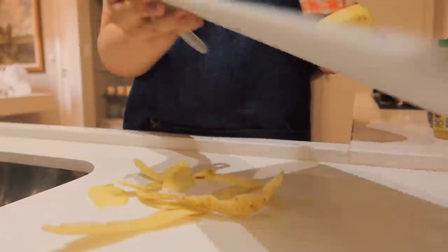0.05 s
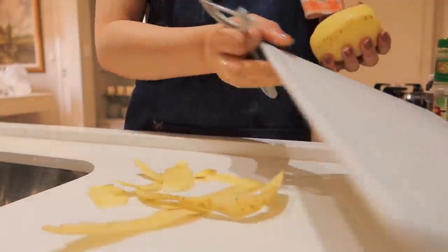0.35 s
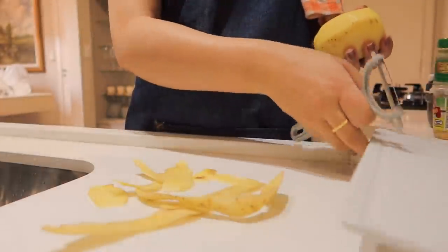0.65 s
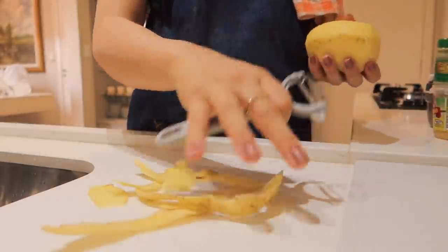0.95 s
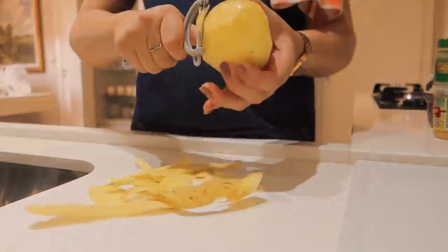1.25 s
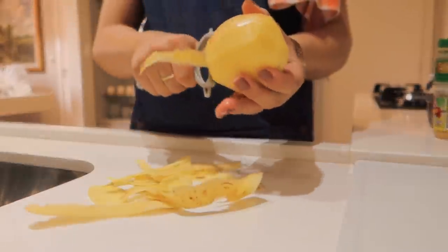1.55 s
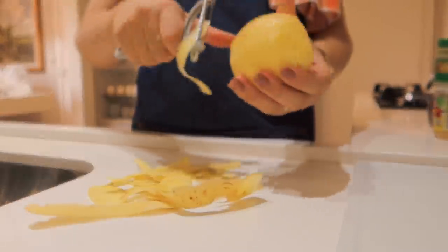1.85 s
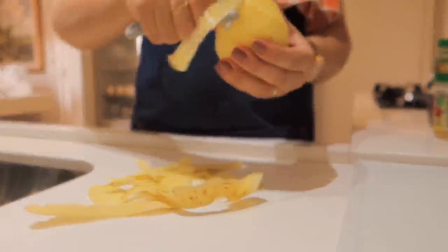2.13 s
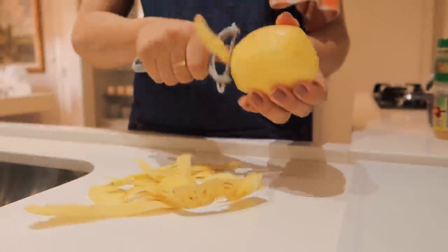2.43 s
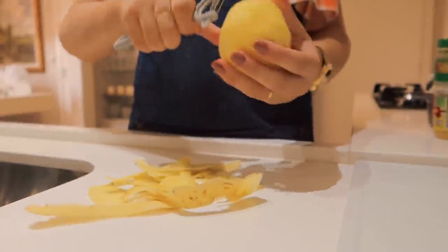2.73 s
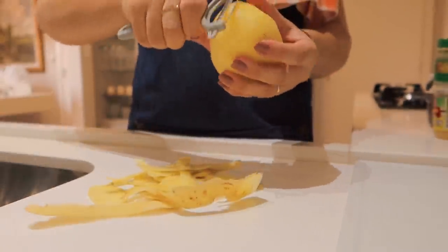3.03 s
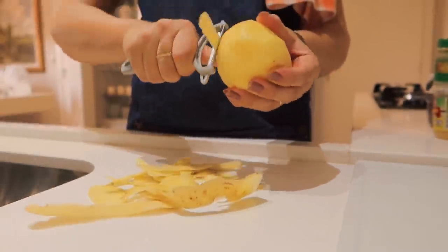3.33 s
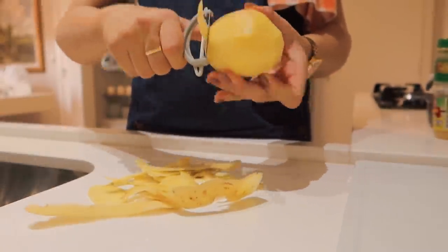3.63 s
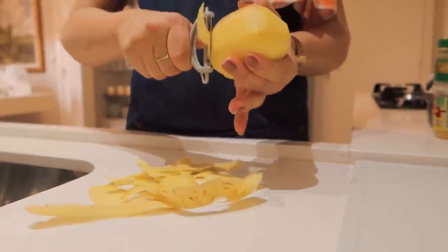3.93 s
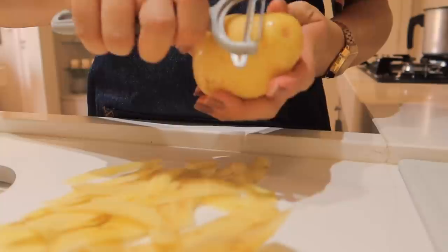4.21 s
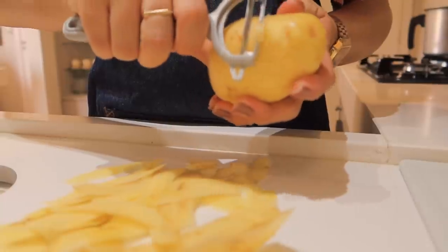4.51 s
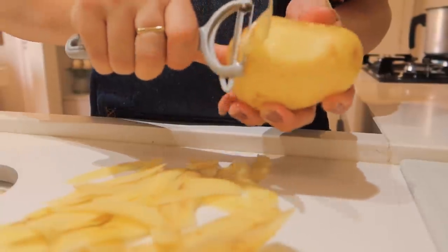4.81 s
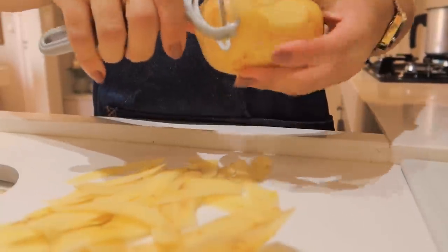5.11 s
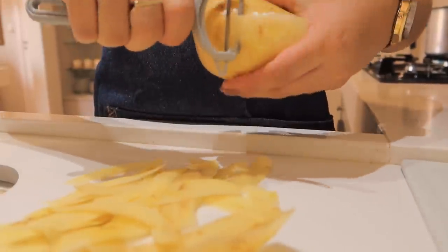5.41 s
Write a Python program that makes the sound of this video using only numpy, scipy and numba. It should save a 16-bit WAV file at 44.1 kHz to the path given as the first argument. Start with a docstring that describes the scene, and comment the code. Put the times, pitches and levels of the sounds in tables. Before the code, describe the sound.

A plastic cutting board clatters onto a kitchen counter, then a hand peeler scrapes a potato in short, irregular strokes.

```python
"""First a plastic cutting board knocks on a kitchen counter, skids and slaps flat.
Each knock is a sharp crack, a clack from the edge and a low boom. Then a hand peeler strips a potato:
each stroke bursts a run of tiny cells and rings the loose swivel blade, which also ticks between strokes.
A small, hard room echoes over a low, steady hush, and the first peaks of the hardest knocks clip."""
import sys
import numpy as np
from scipy import signal
from scipy.fft import rfft, irfft
from scipy.io import wavfile
from scipy.ndimage import uniform_filter1d, map_coordinates
from numba import njit

SR = 44100
rng = np.random.default_rng(int(sys.argv[2]) if len(sys.argv) > 2 else 0)


def inscribe(sig):
    """Save sig as 16-bit PCM at rate SR to the path in sys.argv[1].

    A 1-D sig is mono; a 2-D sig holds one channel per row.
    Samples are clipped to [-1, 1] before scaling.
    """
    pcm = np.round(np.clip(np.atleast_2d(sig).T, -1, 1) * 32767)
    wavfile.write(sys.argv[1], SR, pcm.astype(np.int16))


N = 249606
TIME = np.arange(N) / SR
ONE_SECOND = TIME[:SR]

# Knocks of the board, then three thin, bright clicks of the peeler or a ring on the counter:
# start_s, crack_db, treble_limit_hz, clack_hz, clack_db, boom_db
KNOCKS = [(.189, -6, 16000, 2120, 0.5, -18), (0.2482, -17, 4500, 2160, -26, -25.5),
          (0.5086, -7.5, 3420, 1820, -10.5, -21), (0.524, -20, 2800, 2370, -17, -25),
          (.594, -13, 3880, 316, -14, -28), (0.6012, -4, 4150, 486, -0.5, -27),
          (.607, -9, 3200, 1460, -29, -25.5), (0.6165, -10, 2500, 400, -33, -19),
          (0.658, -9.5, 2230, 282, -2, -33), (.664, -11, 6330, 1600, -18, -17.5),
          (0.6691, -15, 7500, 840, -10, -25), (0.6995, -12, 2220, 2165, -9, -19),
          (0.892, -12.5, 9100, 1410, -36, -56), (0.8979, -0.5, 7700, 1490, 2.5, -31.5),
          (.943, -13, 18000, 7960, -20, -53), (0.9675, -10.5, 17900, 8870, -11.5, -37),
          (.970, -13.5, 14000, 3300, -28, -41)]
# The tones of board and counter: pitch_hz, level_db, fade_s (time to drop by 60 dB)
BOARD_TONES = [(62.5, 6.5, 0.19), (129.7, -2.5, 0.38), (166.5, -2, 0.28), (249.9, -0.5, 0.25),
               (347.8, -15.5, 0.86), (377, -29, 0.4), (444.4, -9, 0.58), (466.6, 4.5, 0.075),
               (560, -7, 0.084), (641, -25, 0.45), (804, -9, 0.12), (867, -16, 0.3), (972, -13, 0.18),
               (1220, -29, 0.27)]
# The tone colour of plastic meeting the counter: pitch_hz, level_db
CONTACT_COLOUR = [(100, 1), (400, -5), (750, 1), (1200, 9.5), (1700, 10.5), (2200, 9.5), (2900, 7),
                  (3400, 4), (4200, 6), (5400, 1), (9000, 3), (12000, 0), (16000, -19)]
def counter_knocks():
    """The board cracks, clacks and booms; thin clicks follow. Gives direct sound and what the room gets."""
    direct, to_room = np.zeros((2, N))
    contact_filter = colour(CONTACT_COLOUR)
    for start_s, crack_db, treble_limit_hz, clack_hz, clack_db, boom_db in KNOCKS:
        contact = undb(crack_db) * fade(0.022)
        crack = through(rng.standard_normal(SR) * contact, contact_filter)
        clack = undb(clack_db) * ring([(clack_hz, 0, 0.016), (2 * clack_hz, -8, 0.014)])
        boom = undb(boom_db) * ring(BOARD_TONES, scatter_db=1.5, detune=0.003)
        cabinet_thud = undb(boom_db - 1) * burst(133, 680, fade_s=0.13)
        # the room gets the crack from all directions, as one smooth pulse, and less of the ringing
        pulse = np.linalg.norm(contact) * np.pad(contact_filter, (0, SR - len(contact_filter)))
        direct_blow = crack + clack + boom + cabinet_thud
        room_blow = pulse + undb(-7.5) * (clack + boom)
        for out, blow in ((direct, direct_blow), (to_room, room_blow)):
            softened = butter(blow, treble_limit_hz, "low")  # a softer hit has less treble
            add(out, start_s, butter(softened, 141, "high"))  # a thin board gives little deep bass
    return direct, to_room


def board_skid(start_s=0.823, land_s=0.897, level_db=-28):
    """The board's edge skids over the counter, louder and louder until it lies flat."""
    swell = np.clip((TIME - start_s) / (land_s - start_s), 0, 1) ** 2 * (TIME < land_s)
    return undb(level_db) * swell * unit(butter(noise(CONTACT_COLOUR), 5500, "low"))


def slap_boom(start_s=0.99, level_db=-30):
    """A soft, low boom follows as the board slaps flat."""
    out = np.zeros(N)
    boom = ring([(65, 4.5, 0.32), (131, -0.5, 0.37), (331, -2.5, 0.31)])
    add(out, start_s, undb(level_db) * boom * rise(0.0089))
    return out


def hand_scuff(peak_s=1.192, width_s=0.021, level_db=-39):
    """A brief, light scuff on the counter as the hand leaves."""
    swell = np.exp(-((TIME - peak_s) / width_s) ** 2)
    return undb(level_db) * swell * unit(noise(CONTACT_COLOUR))


# Each pull of the peeler: start_s, length_s, rise_s, fall_s, level_db, chatter_db, rasp_hz
STROKES = [(1.367, 0.039, .013, 0.015, -34.5, -7, 1970), (1.412, 0.17, 0.056, 0.065, -28.5, -5.5, 2000),
           (1.59, 0.077, 0.048, 0.019, -32.5, -10, 10760), (2.151, 0.058, .014, .024, -42.5, 0, 2460),
           (2.198, 0.1, 0.032, 0.045, -29.5, -8, 8200), (2.297, 0.064, 0.025, 0.018, -38.5, -7, 2100),
           (2.356, 0.06, 0.019, 0.019, -36.5, -5.5, 1970), (2.406, 0.09, 0.048, 0.043, -28.5, -3, 3770),
           (3.243, 0.22, 0.018, 0.022, -30, -14, 2270), (3.901, 0.11, .066, 0.019, -34, -6.5, 10130),
           (4.004, 0.11, 0.0081, 0.064, -29, -9, 1980), (4.173, 0.02, 0.0094, .009, -47.5, -7, 2100),
           (4.224, 0.13, 0.0072, 0.022, -53.5, 3, 4800), (4.333, 0.05, 0.021, 0.014, -48, 12, 3920),
           (4.385, 0.046, 0.026, 0.019, -42.5, 11.5, 4880), (4.44, 0.068, 0.014, 0.032, -42, 6, 3860),
           (4.508, 0.034, 0.02, 0.0099, -35.5, 0, 4700), (4.588, 0.038, 0.008, 0.009, -34, -0.5, 4700),
           (4.697, 0.1, 0.015, 0.069, -29.5, 2.5, 2400), (5.536, 0.1, 0.02, 0.024, -31.5, -0.5, 2820),
           (5.633, .05, .01, .01, -44.5, -3, 2830)]
# The tone colour of potato being cut: pitch_hz, level_db
CUT_COLOUR = [(200, -16), (400, -29), (880, -7), (1180, -15), (1550, -14), (1950, 2.5), (3200, 1.5),
              (4450, -1.5), (5000, -4), (7000, -3), (7800, 0.5), (8600, -5.5), (12100, 2), (12800, -9),
              (15500, -7)]
def peeling(sag_db_per_s=22.5, uneven_db=1.5, rasp_db=-4.5, pop_db=-7):
    """The blade bursts cells as it cuts; where it drags on the skin it sticks, slips and rings."""
    cut, drag, rasp = np.zeros((3, N))
    # the potato resists unevenly from one millimetre to the next
    wobble = unit(uniform_filter1d(rng.standard_normal(N), int(0.0032 * SR) + 1))
    resistance = undb(uneven_db * wobble)
    cells = tiny_snaps(per_s=6000, spread_db=4)
    slips = tiny_snaps(per_s=1000, spread_db=1)
    rubs = tiny_snaps(per_s=4800, spread_db=11.5)
    for start_s, length_s, rise_s, fall_s, level_db, chatter_db, rasp_hz in STROKES:
        hand = press(start_s, start_s + length_s, rise_s, fall_s)
        elapsed_s = np.clip(TIME - start_s, 0, length_s)
        # the first bite is the strongest, and the cut grows louder faster than the hand presses
        bite = undb(level_db - sag_db_per_s * elapsed_s) * hand ** 1.06
        cut += bite
        drag += bite * undb(chatter_db)
        # the strip of peel rasps through the slot, more so as it grows
        strip = np.sqrt(elapsed_s / length_s)
        rubbing = (bite * strip * rubs)[int(start_s * SR):][:SR]
        add(rasp, start_s, undb(rasp_db) * resonate(rubbing, ring([(rasp_hz, 0, 0.012)])))
    tearing = through(cut * resistance * cells, colour(CUT_COLOUR))
    juicy_pops = undb(pop_db) * butter(cut * tiny_snaps(per_s=300, spread_db=3), 8000, "high")
    chatter = resonate(drag * slips, blade_ring() * fade(0.044))  # the potato cuts the ring short
    return hand_bounce(tearing + juicy_pops) + butter(chatter, 670, "high") + butter(rasp, 980, "high")


def hand_bounce(cut, delay_s=0.00108, wander_s=0.000098, bounce_db=-7):
    """The cut's sound bounces off potato and fingers; as they move, its hollow colour shifts."""
    lag_s = delay_s + wander_s * unit(butter(rng.standard_normal(N), 10, "low"))
    bounced = map_coordinates(cut, [(TIME - lag_s) * SR], mode="nearest")
    return (cut + undb(bounce_db) * bounced) / np.hypot(1, undb(bounce_db))


# The tones of the swivel blade and its frame: pitch_hz, level_db, fade_s
BLADE_TONES = [(955, -25, 0.0076), (1700, -0.5, 0.015), (2354, -2.5, 0.027), (3400, -64, 0.059),
               (4230, -15, 0.27), (4040, 8.5, 0.032), (4350, -3, 0.15), (4397, 1.5, 0.078),
               (7250, -22, 0.053), (9550, -4, 0.02), (10840, -19.5, 0.15), (13100, -6, .012)]
def blade_ring(scatter_db=0, detune=0):
    """One tap sets the blade ringing."""
    return ring(BLADE_TONES, scatter_db, detune)


# Light ticks of the loose blade, and two soft nudges of the board on the counter near 1.2 s:
# start_s, snap_db, snap_hz, ring_db
TICKS = [(0.1882, -4, 4600, -40), (0.247, -23.5, 4370, -42), (1.197, -25.5, 1240, -45),
         (1.2153, -25.5, 2400, -41.5), (1.6578, -25.5, 3700, -39), (2.0727, -25, 2110, -33),
         (2.0943, -15, 4250, -33), (2.613, -27, 2640, -46), (2.8713, -26.5, 4520, -42),
         (2.9, -33, 4560, -39), (2.907, -22, 4500, -32.5), (4.232, -35, 4800, -59),
         (5.238, -29.5, 3340, -58), (5.297, -45, 4170, -60)]
def light_ticks(click_db=-9):
    """The loose blade hits its stop, or the board is nudged: a short snap and a faint ring."""
    out = np.zeros(N)
    for start_s, snap_db, snap_hz, ring_db in TICKS:
        snap = burst(0.836 * snap_hz, 1.1 * snap_hz, fade_s=0.014)
        snap += undb(click_db) * burst(1700, 9400, fade_s=0.017)
        ringing = blade_ring(scatter_db=1.5, detune=0.022)
        add(out, start_s, (undb(snap_db) * snap + undb(ring_db) * ringing) * rise(0.00042))
    return out


# Each snap of the peel: start_s, level_db
FLICKS = [(1.305, -50), (1.455, -26), (1.628, -21.5), (1.6325, -16.5), (1.763, -45), (3.4335, -25),
          (3.625, -45.5)]
def peel_flicks():
    """The peel snaps with a bright flick."""
    return bursts(FLICKS, low_hz=8600, high_hz=12900, fade_s=0.016)


# Each bump of peeler on potato: start_s, level_db
BUMPS = [(2.39, -31), (2.6127, -32.5), (3.51, -34)]
def potato_bumps():
    """The peeler meets the hand-held potato with a dull bump."""
    return bursts(BUMPS, low_hz=174, high_hz=447, fade_s=0.049)


def finger_rustle(level_db=-54.5, flutter_db=3.5):
    """Fingers shift on the wet potato with a dull, uneven rustle."""
    flutter = unit(butter(rng.standard_normal(N), 46, "low"))
    busy = press(start_s=1.1, end_s=4.92, rise_s=0.4, fall_s=0.4)
    rustle = unit(butter(rng.standard_normal(N), [230, 900], "band"))
    return busy * undb(level_db + flutter_db * flutter) * rustle


# How the kitchen echoes, from low to high: pitch_hz, level_db, fade_s
ROOM_ECHO = [(100, 1, 0.9), (394, 3, 0.7), (1550, -8, 0.55), (3520, -6.5, 0.54), (8700, -11.5, 0.4),
             (15000, -10, 0.27)]
def kitchen_echo(sound):
    """Counter, tiles and cupboards throw the sound back; the treble dies first."""
    pitch_hz, level_db, fade_s = np.transpose(ROOM_ECHO)
    edges_hz = np.geomspace(50, 18000, 13)
    echo = np.zeros(SR)
    for low_hz, high_hz in zip(edges_hz, edges_hz[1:]):
        middle = np.log(low_hz * high_hz) / 2
        gain = undb(np.interp(middle, np.log(pitch_hz), level_db))
        decay = fade(np.interp(middle, np.log(pitch_hz), fade_s)) * rise(0.0037)
        band = butter(rng.standard_normal(SR), [low_hz, high_hz], "band", order=3)
        echo += gain * band * decay / np.linalg.norm(decay)
    return through(sound, echo)


# The tone colour of the quiet kitchen: pitch_hz, level_db
HUSH_COLOUR = [(15, -43), (25, -7.5), (64, -1), (180, -2.5), (242, -4), (335, -5), (489, -9.5), (545, -7),
               (840, -11), (1610, -14.5), (2160, -14.5), (2550, -16.5), (16000, -28)]
def kitchen_hush(hush_db=-49.5, whistle_db=-59, whistle_start_s=4.2):
    """A low, steady hush; late on, a faint whistle joins it."""
    hush = undb(hush_db) * unit(noise(HUSH_COLOUR))
    whistle = unit(butter(rng.standard_normal(N), [1570, 1710], "band"))
    return hush + undb(whistle_db) * whistle * np.clip((TIME - whistle_start_s) / 0.023, 0, 1)


def undb(db):
    """Turn decibels into a number to multiply by."""
    return 10 ** (np.asarray(db) / 20)


def unit(x):
    """Scale to an average strength (rms) of 1."""
    return x / np.sqrt(np.mean(x ** 2) + 1e-18)


def add(out, start_s, x):
    """Mix x into out, beginning at start_s."""
    i = int(start_s * SR)
    out[i:i + len(x)] += x[:N - i]


def through(x, response):
    """Filter x; response is the sound the filter makes from one click."""
    return signal.fftconvolve(x, response)[:len(x)]


def resonate(x, ringing):
    """Let x shake something that rings, with the ring's energy scaled to 1."""
    return through(x, ringing / np.linalg.norm(ringing))


def colour(points, size=4096):
    """Make a filter response of energy 1 from (pitch_hz, level_db) points."""
    pitch_hz, level_db = np.transpose(points)
    grid_hz = np.maximum(np.arange(size // 2 + 1) * SR / size, 1)
    gains = undb(np.interp(np.log(grid_hz), np.log(pitch_hz), level_db))
    # pack the response's energy as early as it can go, so clicks stay sharp
    cepstrum = irfft(np.log(gains))
    cepstrum[1:size // 2] *= 2
    cepstrum[size // 2 + 1:] = 0
    response = irfft(np.exp(rfft(cepstrum)))
    return response / np.linalg.norm(response)


def noise(points):
    """Steady noise with the given tone colour."""
    return through(rng.standard_normal(N), colour(points))


def butter(x, hz, kind, order=2):
    """Keep the lows, the highs or a band between."""
    sections = signal.butter(order, np.clip(hz, 10, 0.45 * SR), kind, fs=SR, output="sos")
    return signal.sosfilt(sections, x)


def fade(fade_s):
    """Die away by 60 dB in fade_s."""
    return undb(-60 * ONE_SECOND / fade_s)


def rise(rise_s):
    """Climb from 0 towards 1 to soften a start."""
    return 1 - np.exp(-ONE_SECOND / rise_s)


def press(start_s, end_s, rise_s, fall_s):
    """Rise, hold at 1 and fall."""
    return np.clip(np.minimum((TIME - start_s) / rise_s, (end_s - TIME) / fall_s), 0, 1)


def ring(tones, scatter_db=0, detune=0):
    """Strike (pitch_hz, level_db, fade_s) tones; level and pitch can vary with the spot that is hit."""
    out = np.zeros(SR)
    for pitch_hz, level_db, fade_s in tones:
        louder, sharper = rng.standard_normal(2)
        wave = np.sin(2 * np.pi * pitch_hz * (1 + detune * sharper) * ONE_SECOND)
        out += undb(level_db + scatter_db * louder) * fade(fade_s) * wave
    return out


def tiny_snaps(per_s, spread_db):
    """A random run of tiny snaps of uneven size."""
    happens = rng.random(N) < per_s / SR
    return unit(happens * rng.choice([-1, 1], N) * undb(spread_db * rng.standard_normal(N)))


def burst(low_hz, high_hz, fade_s):
    """A dying puff of noise that starts near strength 1."""
    decay = fade(fade_s)
    puff = butter(rng.standard_normal(SR) * decay, [low_hz, high_hz], "band")
    return unit(puff) * np.sqrt(np.mean(decay ** 2))


def bursts(events, low_hz, high_hz, fade_s):
    """Play one burst for each event."""
    out = np.zeros(N)
    for start_s, level_db in events:
        add(out, start_s, undb(level_db) * burst(low_hz, high_hz, fade_s))
    return out


def scene(peeler_echo_db=-6):
    """The broad board fills the room; the peeler is close by, so it has less echo."""
    knocks, knocks_to_room = counter_knocks()
    scrapes = board_skid() + hand_scuff()
    peeler = peeling() + light_ticks() + peel_flicks() + potato_bumps() + finger_rustle()
    echo = kitchen_echo(knocks_to_room + scrapes + undb(peeler_echo_db) * peeler)
    return (knocks + scrapes + slap_boom() + peeler + echo + kitchen_hush())[None]


def record(dry, top_hz=15800):
    """The first peaks of the hardest knocks clip, and the top treble is cut."""
    clipped = np.clip(dry, -1, 1)
    return signal.sosfilt(signal.ellip(10, 0.2, 70, top_hz, fs=SR, output="sos"), clipped)


dry = scene()
out = record(dry)
inscribe(out)
```